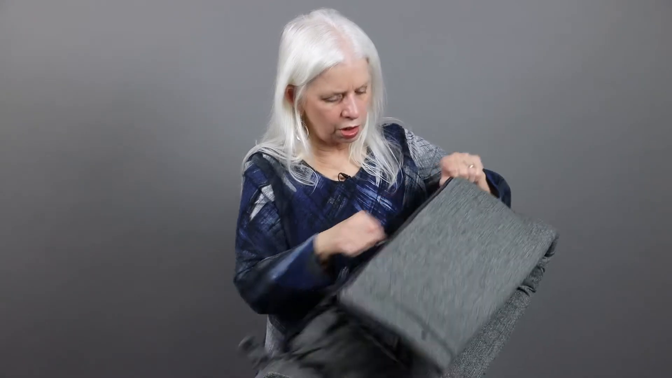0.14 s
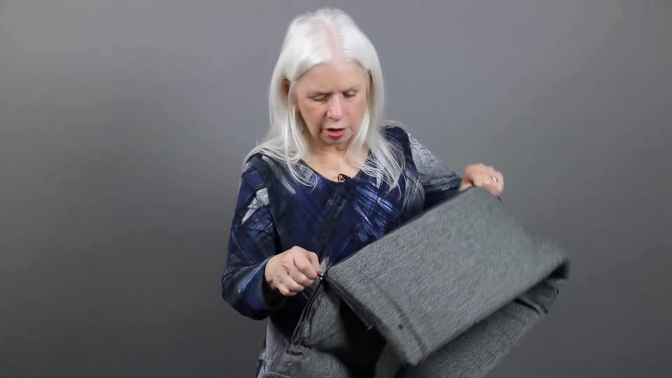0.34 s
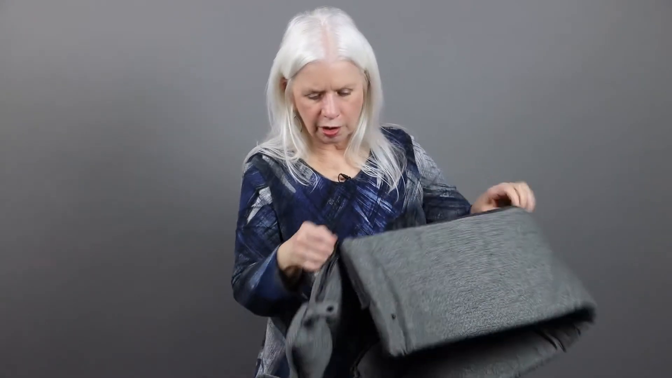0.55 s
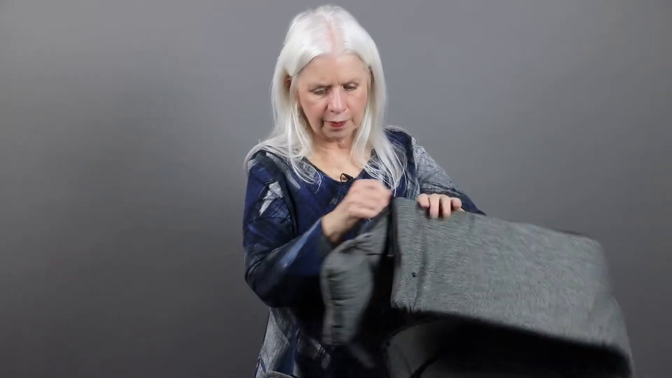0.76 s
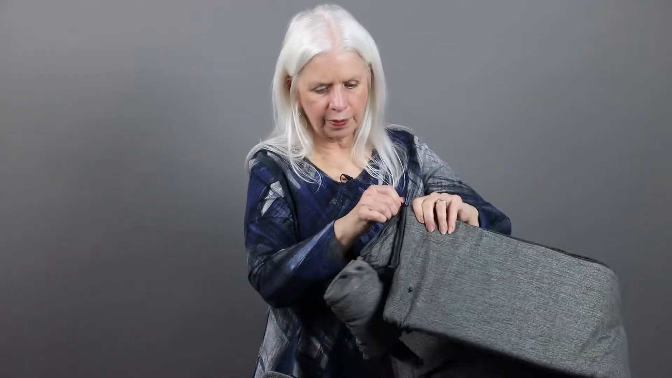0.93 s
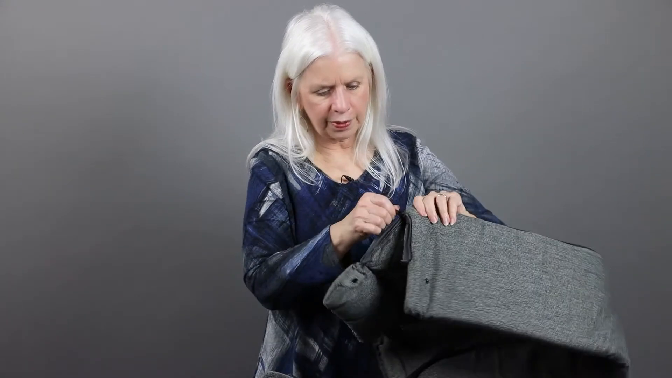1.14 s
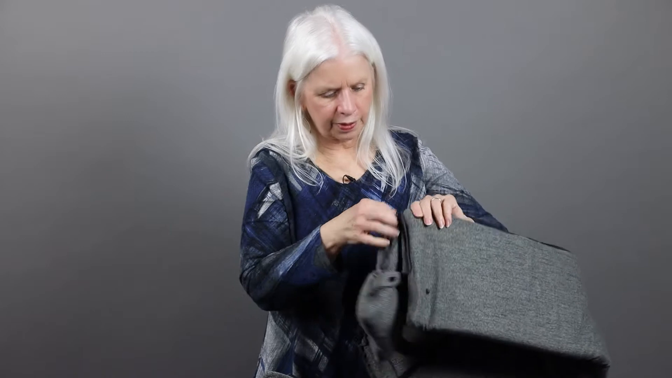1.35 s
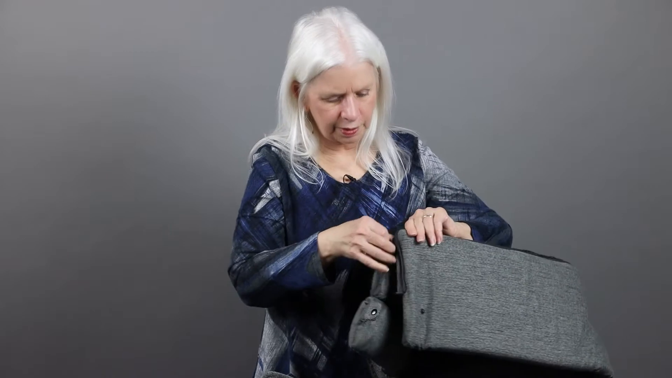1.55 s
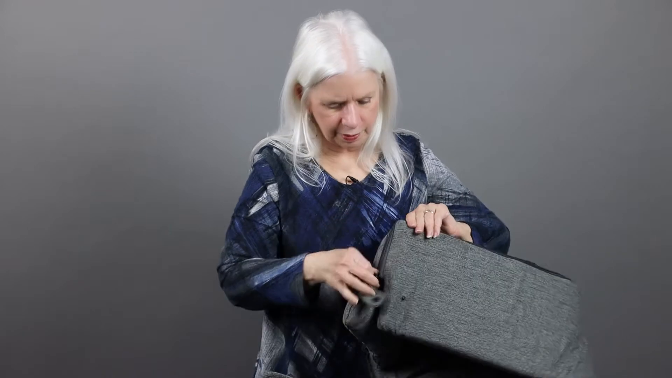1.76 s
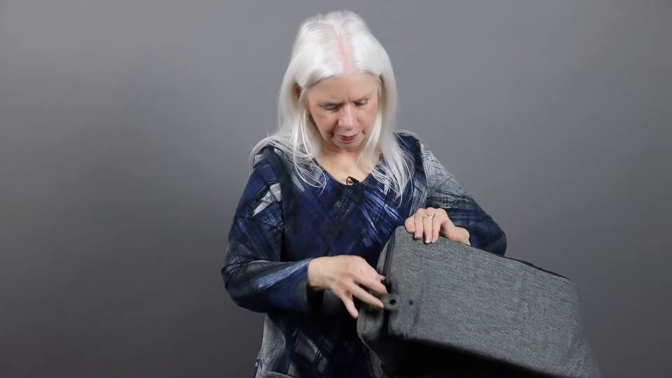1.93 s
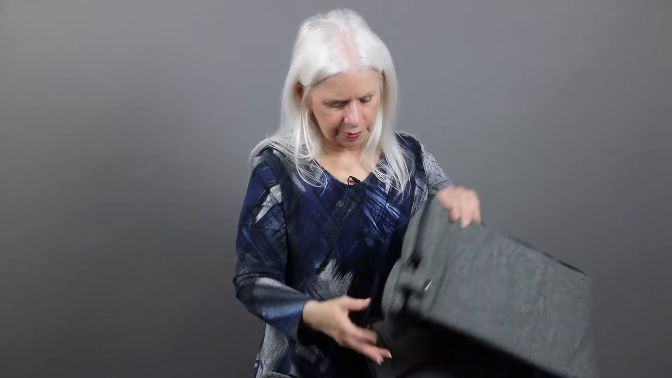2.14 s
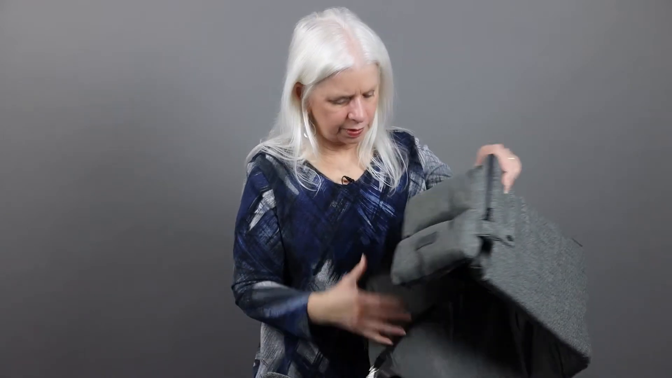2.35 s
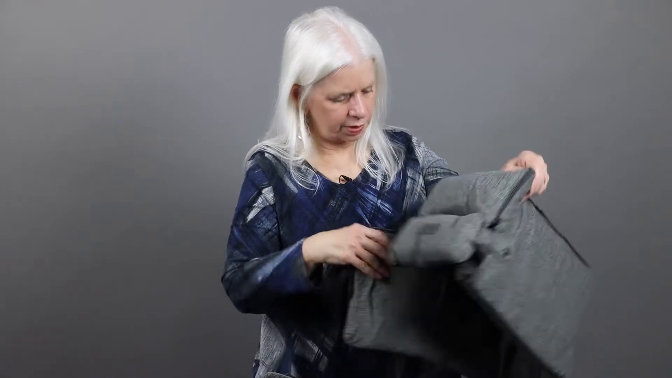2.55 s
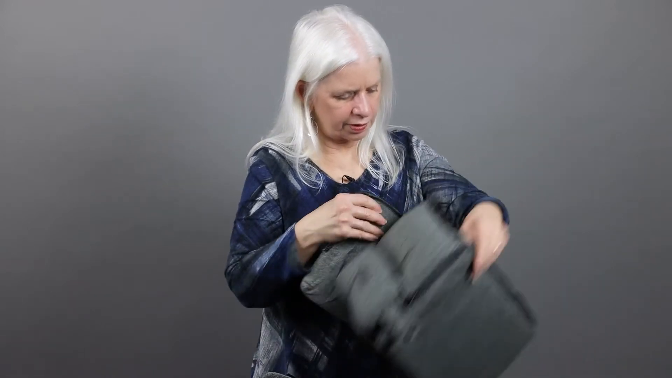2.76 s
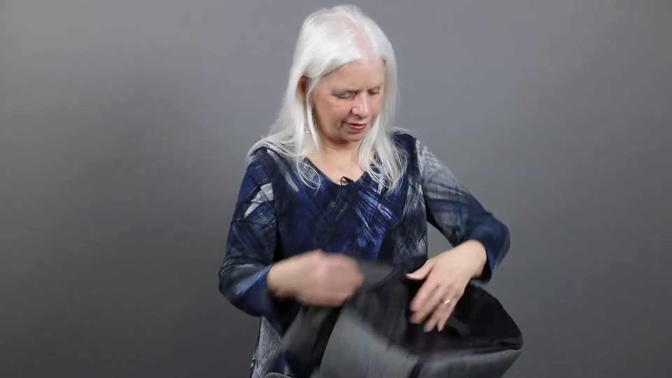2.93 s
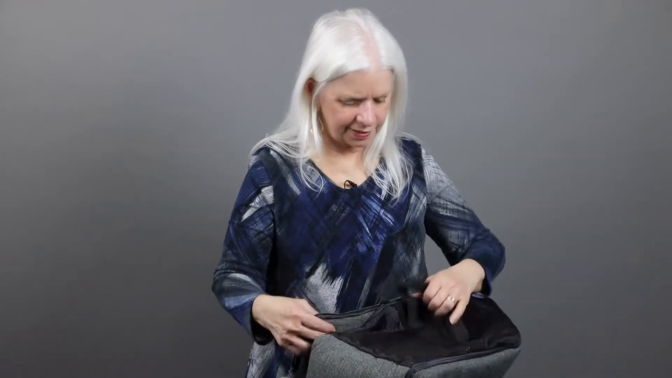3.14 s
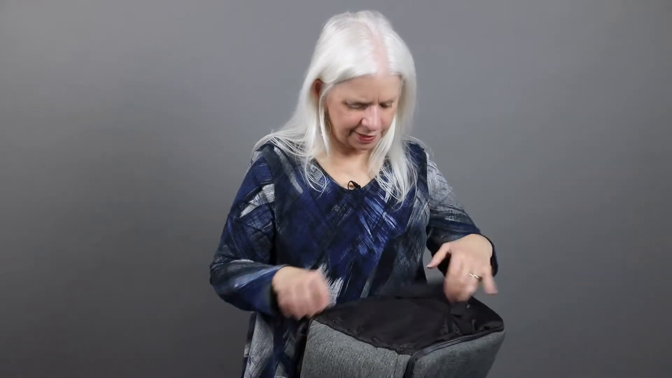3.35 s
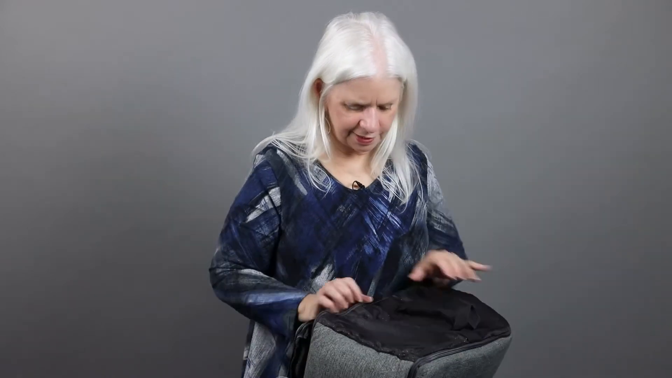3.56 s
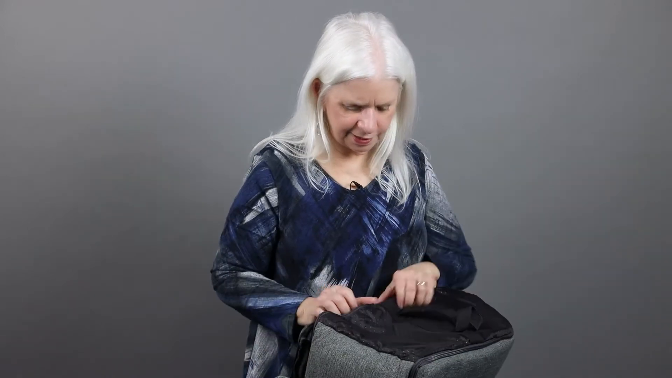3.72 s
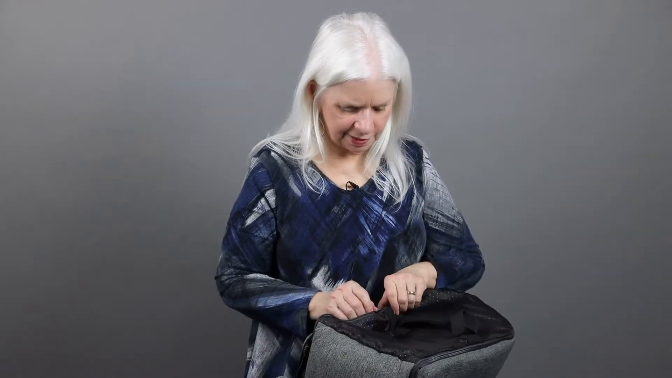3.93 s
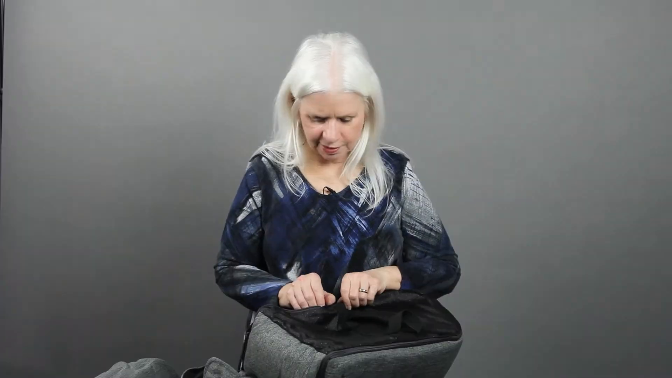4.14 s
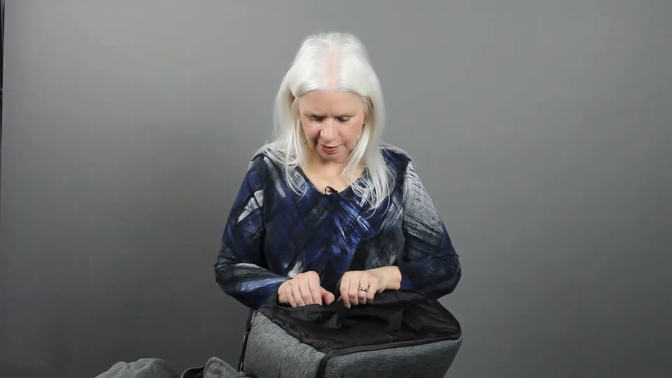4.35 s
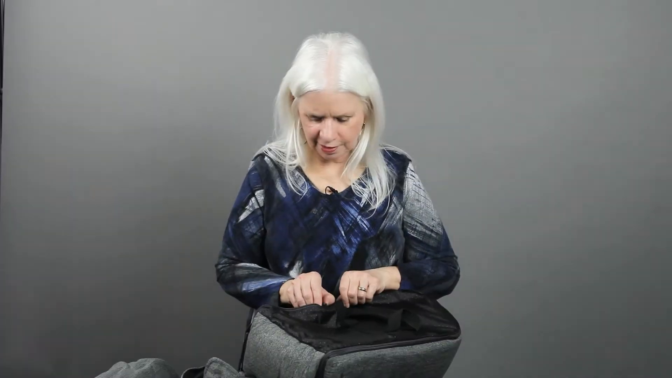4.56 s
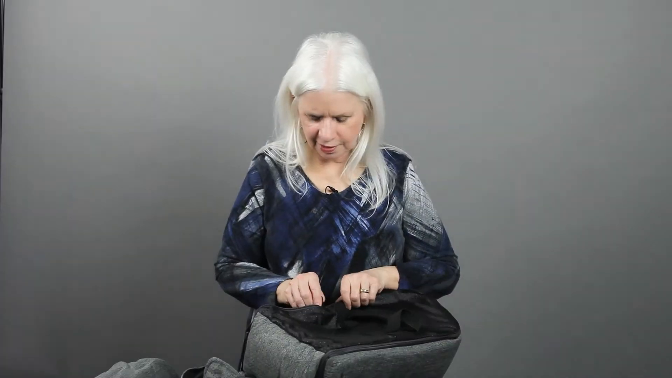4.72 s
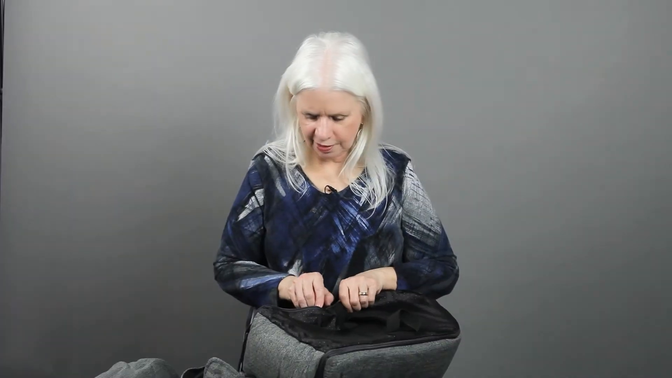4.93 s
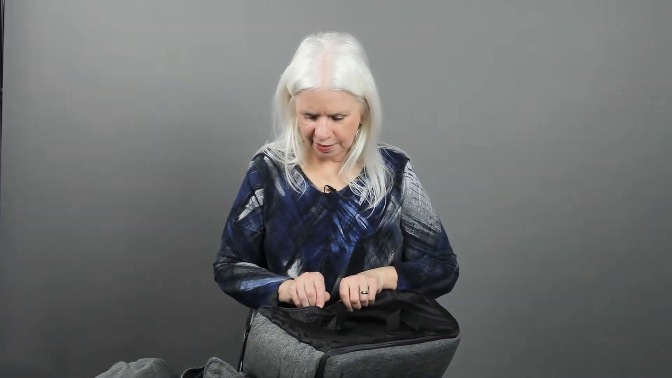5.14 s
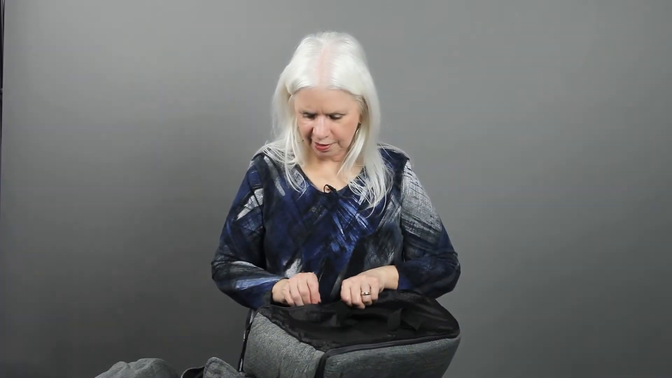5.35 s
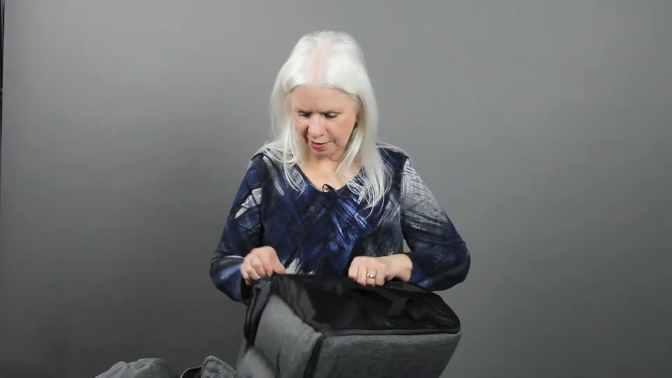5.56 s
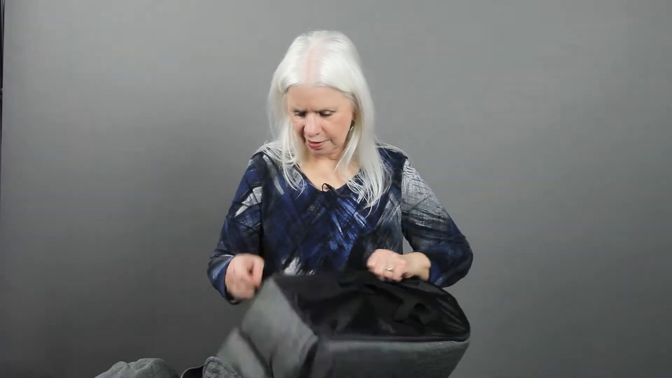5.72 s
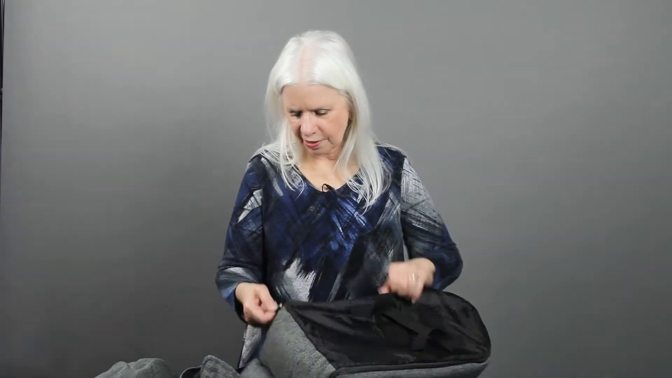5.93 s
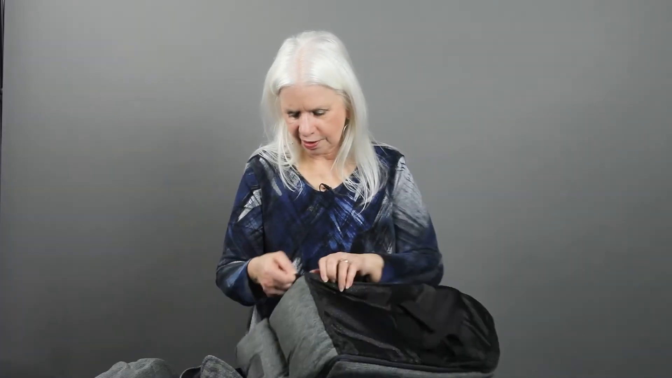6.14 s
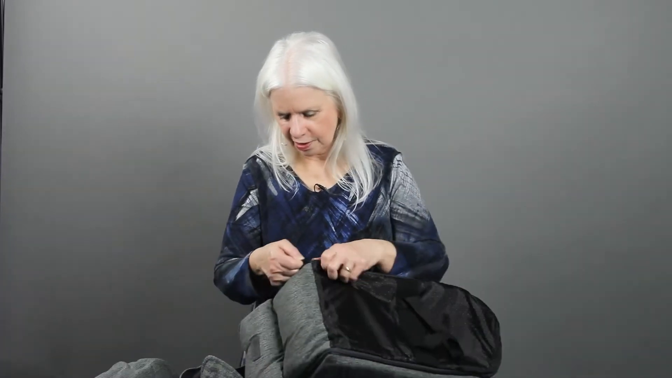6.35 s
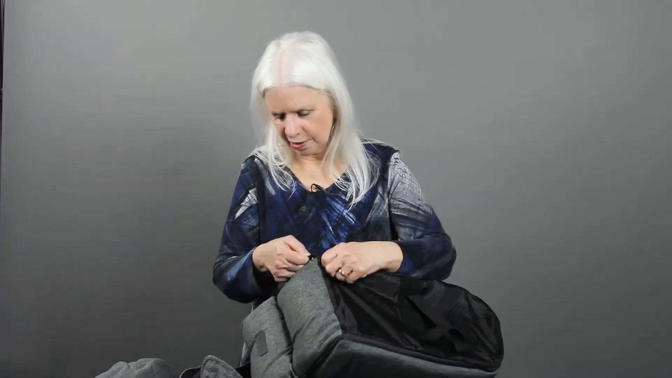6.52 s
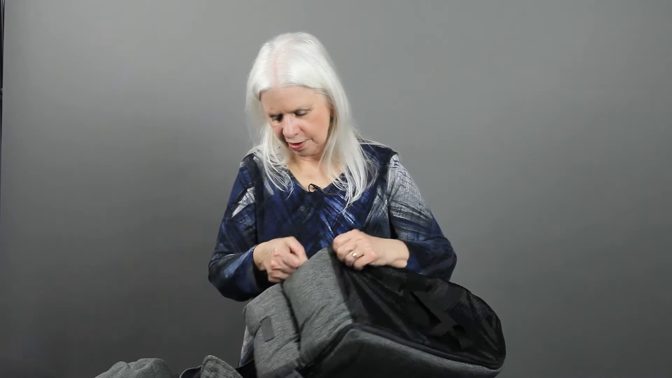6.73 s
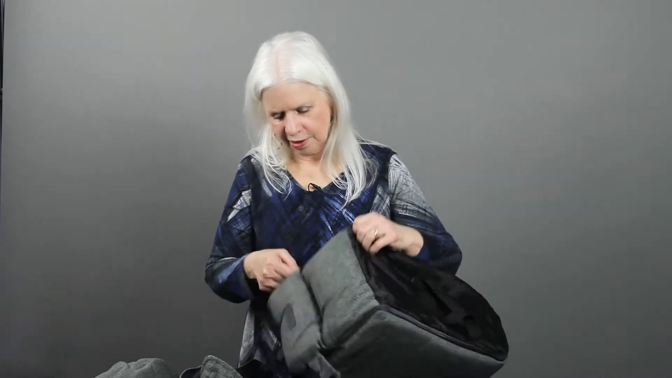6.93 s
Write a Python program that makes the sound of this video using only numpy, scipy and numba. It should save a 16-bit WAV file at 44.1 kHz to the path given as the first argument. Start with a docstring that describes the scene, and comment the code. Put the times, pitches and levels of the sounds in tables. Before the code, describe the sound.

A padded fabric bag is zipped shut close to a clip-on microphone in a quiet, dry room. The first zip is the longest and brightest, and a shorter one follows. Then the bag is shifted about, with nylon rustling, soft bumps, hand scrapes, ticks of the pull tab, tiny tugs on the slider and one brief strap squeak. Near the end come a quieter zip, a thump and a last quick zip.

```python
"""Zipping a padded bag shut

Four pulls and a few nudges, close to a clip-on microphone in a dry room. Each tooth knocks the bag's panels and
cracks in the slider. Fibres rustle, padding rumples, the bag heaves and bumps; hands stroke and scrape the
nylon, the pull tab ticks, the strap squeaks once."""
import sys
import numpy as np
from scipy import signal
from scipy.fft import rfft, irfft
from scipy.io import wavfile
from scipy.ndimage import uniform_filter1d
from numba import njit

SR = 44100
rng = np.random.default_rng(int(sys.argv[2]) if len(sys.argv) > 2 else 0)


def master(y):
    """Save y as 16-bit WAV."""
    cut = np.clip(np.atleast_2d(y).T, -1, 1)
    pcm = np.round(cut * 32767)  # scale
    wavfile.write(sys.argv[1], SR, pcm.astype(np.int16))


N = 308126

# handled cloth: (time [s], rustle [dB], rumple [dB])
CLOTH_LEVELS = [(.41, -56, -43), (.64, -63, -57), (1.05, -47, -55), (1.2, -58, -53.5), (1.45, -53, -57.5),
                (1.85, -49, -39.5), (1.95, -59.5, -55.5), (2.2, -60, -57.5), (2.7, -50.5, -51),
                (3.1, -54, -45), (3.25, -50.5, -54.5), (3.58, -44, -43.5), (3.65, -67, -66),
                (3.95, -56.5, -48), (4.16, -66.5, -61.5), (4.5, -68.5, -58), (4.95, -69, -64.5),
                (5.28, -68.5, -66), (5.36, -45.5, -45.5), (5.72, -46, -42), (5.95, -61.5, -62.5),
                (6.19, -64.5, -54.5), (6.42, -53, -53), (6.62, -55, -50.5), (6.92, -52, -49),
                (6.987, -41.5, -46.5)]
# rubbing fibres: (frequency [Hz], density [dB])
FIBRE_SPECTRUM = [(710, -47), (1200, -8.5), (1780, -2), (3010, 3), (3840, -0.5), (5160, 1), (5760, -1),
                  (8930, -0.5), (14900, -4.5), (16000, -20), (16500, -32.5)]
# padding: (centre [Hz], width [Hz], gain [dB])
PADDING_MODES = [(171.1, 151.6, -3.5), (299.4, 136, 3), (426.8, 223.3, 2), (880, 1193, -8)]


def undb(db):
    return 10 ** (np.asarray(db) / 20)


def unit(x):
    return x / np.sqrt(np.mean(x ** 2))


def levelled(x):
    """Running rms held at 1 over 30 ms."""
    return x / np.sqrt(uniform_filter1d(x ** 2, size=1300, mode="reflect") + 1e-9)


def curves(rows):
    """Columns of a timed table, one value per sample."""
    times_s, *columns = np.transpose(rows)
    return [np.interp(np.arange(N) / SR, times_s, column) for column in columns]


def add(track, x, start_s):
    i = int(start_s * SR)
    track[i:i + len(x)] += x[:N - i]


@njit
def bandpass(x, hz, width_hz):
    """State-variable filter, gain 1 at its moving centre."""
    y, band, low = np.empty(len(x)), 0., 0.
    for i in range(len(x)):
        g, damping = np.tan(np.pi * hz[i] / SR), width_hz / hz[i]
        v = (band + g * (x[i] + 1e-18 - low)) / (1 + g * (g + damping))
        band, low = 2 * v - band, low + 2 * g * v
        y[i] = damping * v
    return y


def ring(x, modes):
    """Sum of resonances of alternating sign."""
    return sum((-1) ** k * undb(db) * bandpass(x, np.full(len(x), float(hz)), float(width_hz))
               for k, (hz, width_hz, db) in enumerate(modes))


def flexing_ring(x, modes, swing_db):
    """Resonances that swell and fade separately as the bag flexes."""
    return sum((-1) ** k * undb(swing_db * wander(40)[:len(x)]) * ring(x, [mode])
               for k, mode in enumerate(modes))


def wander(rate_hz):
    """Random steps, smoothed twice."""
    hold = int(SR / rate_hz)
    steps = np.repeat(rng.standard_normal(N // hold + 1), hold)
    return uniform_filter1d(uniform_filter1d(steps, hold), hold)[:N]


def grit(n, scatter_db, share):
    """Noise in which a share of the samples are fibre slips of uneven size."""
    slips = (rng.random(n) < share) * undb(scatter_db * np.minimum(rng.exponential(size=n), 3))
    return unit(rng.standard_normal(n) * (1 + slips))


def coloured(x, spectrum):
    """x shaped by (Hz, dB) points, at rms 1."""
    hz, db = np.transpose(spectrum)
    bins_hz = np.maximum(np.fft.rfftfreq(len(x), 1 / SR), 1)
    gain = undb(np.interp(np.log(bins_hz), np.log(hz), db))
    return unit(irfft(rfft(x) * gain, len(x)))


@njit
def tooth_pulses(hz, rate_factor, strength):
    """One pulse per tooth, split between two samples; each gap has its own length."""
    pulses, phase, tooth = np.zeros(len(hz) + 1), .999, 0
    for i in range(len(hz)):
        step = hz[i] * rate_factor[tooth] / SR
        phase += step
        if phase >= 1:
            phase, tooth = phase - 1, tooth + 1
            pulses[i] += strength[tooth] * phase / step
            pulses[i + 1] += strength[tooth] * (1 - phase / step)
    return pulses[:-1]


def slider_run(hz, knock_db, crack_rel_db, zing_rel_db, panels, jitter, scatter_db):
    """Teeth knock the panels, whose upper modes zing; each also cracks and fizzes in the slider."""
    # (centre [Hz], width [Hz], gain [dB])
    slider_modes = [(2717, 554, -2.5), (4234, 6100, -6.5), (6930, 3820, -1), (9870, 4300, -3),
                    (13320, 10500, -10)]
    n, fizz_s = len(hz), .0006
    hz = hz * (1 + .012 * wander(60)[:n])  # hand speed wavers
    gap_draw, strength_draw = rng.standard_normal((n // 20 + 2, 2)).T
    pulses = tooth_pulses(hz, np.clip(1 + jitter * gap_draw, .3, 3), undb(scatter_db * strength_draw))
    fizz = signal.lfilter([1], [1, -np.exp(-1 / (fizz_s * SR))], pulses)
    friction = fizz + .22 * hz / 1000  # slider scrapes the tape more at speed
    crack = flexing_ring(pulses + .2 * friction * rng.standard_normal(n), slider_modes, swing_db=2.5)
    push = pulses + .04 * friction * rng.standard_normal(n)
    knock = levelled(ring(push, panels[:2]))
    zing = levelled(flexing_ring(push, panels[2:], swing_db=4.5))
    zing *= undb(1.5 * wander(70)[:n])  # tape flexes
    return undb(knock_db) * (knock + undb(zing_rel_db) * zing - undb(crack_rel_db) * levelled(crack))


def pulls():
    """Four long slider runs; faster teeth zing more, 1 dB per octave."""
    # per pull: (time [s], tooth rate [Hz], knock [dB], crack [dB])
    gestures = [
        [(.009, 116.6, -31, -32), (.047, 233.3, -26, -31.5), (.07, 355.1, -22.5, -27.5),
         (.09, 504.1, -23.5, -21), (.14, 792.2, -41, -25.5), (.165, 880, -24.5, -23), (.201, 961.8, -37.5, -29),
         (.241, 895, -18, -26), (.265, 745, -20.5, -30), (.357, 687.1, -23.5, -33.5),
         (.373, 338.2, -31.5, -32.5), (.41, 234.8, -33.5, -49)],
        [(1.633, 91.54, -37.5, -38), (1.669, 137.1, -39, -38.5), (1.687, 220.8, -31.5, -35.5),
         (1.723, 455.2, -32, -30.5), (1.743, 554, -24, -29), (1.757, 585.7, -30, -27.5),
         (1.767, 523.1, -24, -28.5), (1.801, 263, -26.5, -34.5), (1.85, 403, -25.5, -27)],
        [(5.334, 84.83, -40.5, -55), (5.375, 137.6, -40.5, -60.5), (5.397, 218.7, -38.5, -50.5),
         (5.443, 315.1, -38.5, -44.5), (5.473, 531.9, -40.5, -44), (5.501, 638.5, -32, -39.5),
         (5.527, 573.9, -31, -43.5), (5.575, 285.1, -34, -47), (5.605, 253, -32.5, -48.5),
         (5.679, 356.9, -33.5, -48), (5.71, 294.3, -38.5, -54.5)],
        [(6.622, 39.69, -41, -50.5), (6.642, 61.58, -36.5, -47), (6.668, 125, -29.5, -33),
         (6.7, 222.1, -27.5, -44), (6.722, 296, -28.5, -42), (6.749, 413.9, -28, -39),
         (6.803, 685.4, -31.5, -32), (6.815, 762.4, -44.5, -33.5), (6.83, 686, -26.5, -34.5)],
    ]
    # per pull, panels near the slider: (centre [Hz], width [Hz], gain [dB])
    panel_modes = [
        [(257.4, 101.5, 7.5), (768.6, 150, 10), (1561, 480, 0.5), (2360, 2600, -5)],
        [(257.4, 123.3, 2), (1142, 288, -4), (2280, 238, -1), (2890, 167, -6.5)],
        [(325, 85, 4), (745, 185, 1.5), (1338, 131, 6.5), (2500, 1140, -1)],
        [(230, 324, 6), (767, 289, 9), (1534, 396, 5.5), (2196, 346, 4.5)],
    ]
    # per pull: (zing over crack at 500 Hz [dB])
    zings_db = [-3.5, -9.5, 8.5, -1.5]
    # per pull: (tooth gap spread [ratio], tooth strength spread [dB])
    roughness = [(.022, 2.5), (.025, 2.0), (.035, 2.5), (.018, 2.0)]
    out = np.zeros(N)
    for rows, panels, zing_db, spreads in zip(gestures, panel_modes, zings_db, roughness):
        start_s, end_s = rows[0][0], rows[-1][0]
        hz, knock_db, crack_db = (c[int(start_s * SR):int(end_s * SR)] for c in curves(rows))
        crack_rel_db = crack_db - knock_db
        zing_rel_db = crack_rel_db + zing_db + np.log2(hz / 500)
        add(out, slider_run(hz, knock_db, crack_rel_db, zing_rel_db, panels, *spreads), start_s)
    return out


def cloth():
    """Fibres rustle in the treble, padding rumples below."""
    rustle_db, rumple_db = curves(CLOTH_LEVELS)
    fibres = coloured(grit(N, scatter_db=4.5, share=.006), FIBRE_SPECTRUM)
    # folds of different size sound at different moments
    folds = sum((-1) ** k * bandpass(fibres, np.full(N, hz), hz / 2) * undb(2.5 * wander(15))
                for k, hz in enumerate(1500 * 2 ** np.arange(0, 3.6, .5)))
    rustle = unit(folds) * undb(3 * wander(60))
    padding = unit(ring(grit(N, scatter_db=7, share=.0077), PADDING_MODES))
    rumple = padding * undb(5.84 * wander(35) + 1.49 * wander(9.8))
    return undb(rustle_db) * rustle + undb(rumple_db) * rumple


def heaves():
    """The bag heaves near the microphone: low puffs over a floor that follows the rumple."""
    # (time [s], peak [dB])
    puffs = [(.13, -33), (.25, -29), (.64, -47.5), (.84, -32), (1.08, -45.5), (1.4, -46), (1.65, -43.5),
             (1.85, -45.5), (2.12, -46), (2.33, -45), (2.57, -44), (2.94, -37), (3.13, -44), (3.46, -36.5),
             (3.79, -46), (4.42, -51), (5.43, -61.5), (5.76, -32.5), (5.93, -48), (6.17, -57),
             (6.48, -53.5), (6.65, -50.5), (6.831, -35), (6.99, -51.5)]
    rise_db_per_s, fall_db_per_s, floor_rel_db = 398.5, 262.5, -5.5
    t, puff_db = np.arange(N) / SR, np.full(N, -120.)
    for peak_s, peak_db in puffs:
        slopes_db = np.minimum(rise_db_per_s * (t - peak_s), fall_db_per_s * (peak_s - t))
        puff_db = np.maximum(puff_db, peak_db + slopes_db)
    _, rumple_db = curves(CLOTH_LEVELS)
    bass = unit(ring(rng.standard_normal(N), [(30, 30, 0), (110, 130, -7)])) * undb(2 * wander(15))
    return (undb(puff_db) + undb(rumple_db + floor_rel_db)) * bass


def bumps():
    """Bumped padding: a noisy ring that falls by 1/e per cycle."""
    # (time [s], peak [dB], pitch [Hz])
    blows = [(.259, -12.5, 323.8), (.405, -17.5, 584), (.654, -26.5, 565.7), (.962, -30, 480),
             (1.576, -26, 935), (1.602, -36.5, 186), (2.132, -32, 220), (2.334, -29, 545),
             (2.536, -36.5, 151), (2.696, -26, 646), (2.921, -17, 453.5), (3.034, -19, 390),
             (3.103, -19.5, 452), (3.28, -33.5, 371), (3.325, -29.5, 301), (3.491, -31.5, 207),
             (3.575, -33, 323), (3.804, -26.5, 393), (4.396, -24.5, 406), (5.756, -13.5, 323.4),
             (6.1295, -27, 416), (6.471, -28, 409.5), (6.825, -16, 546), (6.979, -27, 899)]
    out = np.zeros(N)
    for start_s, peak_db, hz in blows:
        cycles = np.arange(int(6 * SR / hz)) * hz / SR
        grain = uniform_filter1d(rng.standard_normal(len(cycles)), 1 + int(SR / hz / 6))
        thud = np.exp(-cycles) * (np.sin(2 * np.pi * cycles) + grain)
        add(out, undb(peak_db) * thud / np.abs(thud).max(), start_s)
    return out


def rub(length_s, padding_rel_db):
    """Weave and padding rubbed together."""
    n = int(length_s * SR)
    weave = coloured(grit(n, scatter_db=6.5, share=.03), FIBRE_SPECTRUM)
    padding = unit(ring(grit(n, scatter_db=7.5, share=.012), PADDING_MODES))
    return weave + undb(padding_rel_db) * padding


def strokes():
    """A slow hand on the cloth: friction swells and fades."""
    # (time [s], length [s], weave [dB], padding re weave [dB])
    passes = [(.44, 0.245, -50.5, 0), (1.138, 0.13, -50, -21.5), (1.38, 0.1363, -45, -4),
              (2.149, 0.1003, -46.5, -8), (2.321, 0.087, -55.5, 2.5), (2.492, 0.101, -48, -18),
              (2.645, 0.286, -44.5, -17), (3.284, 0.19, -48, -10), (3.539, 0.158, -52, 4.5),
              (3.785, 0.132, -53.5, 3), (3.898, 0.053, -51.5, 3.5), (4.142, 0.121, -59, 6),
              (4.41, 0.184, -59.5, 3.5), (4.492, 0.048, -63, 3), (4.692, 0.165, -59.5, 7),
              (5.843, 0.221, -52.5, 4), (6.169, 0.1133, -51.5, 6), (6.353, 0.0413, -49.5, -10.5)]
    out = np.zeros(N)
    for start_s, length_s, db, padding_rel_db in passes:
        friction = rub(length_s, padding_rel_db)
        swell = np.sin(np.pi * np.linspace(0, 1, len(friction)) ** .634)
        add(out, undb(db) * swell * friction, start_s)
    return out


def scrapes():
    """A hand or strap dragged over nylon catches at once and lets go quickly."""
    # (time [s], length [s], weave [dB], padding re weave [dB])
    drags = [(0.604, 0.0674, -39, -8), (0.826, 0.0709, -31, -4.5), (0.995, 0.0147, -42, -25.5),
             (2.127, 0.023, -44, 1), (2.514, 0.0503, -46, -11.5), (2.69, 0.0203, -39.5, 2.5),
             (3.011, 0.156, -40.5, 2), (3.494, .035, -37.5, -3.5), (5.726, 0.0345, -38.5, -0.5),
             (5.925, 0.058, -44.5, -5.5), (6.122, 0.0277, -50, 14.5), (6.439, 0.0253, -44.5, -8),
             (6.538, 0.0592, -45.5, -3.5)]
    out = np.zeros(N)
    for start_s, length_s, db, padding_rel_db in drags:
        friction = rub(length_s, padding_rel_db)
        grip = np.interp(np.linspace(0, 1, len(friction)), [0, .04, .8, 1], [.032, .915, 1, .185])
        add(out, undb(db) * grip * friction, start_s)
    return out


def ticks():
    """The pull tab ticks: a blow rings the tab modes nearest its pitch and taps the padding; fainter ticks of
    the same kind fall at random, following the rustle."""
    # (time [s], peak [dB], pitch [Hz])
    blows = [(.9836, -32, 2960), (.9926, -36.5, 5220), (1.0824, -30, 8200), (1.089, -20.5, 6440),
             (1.319, -33, 8040), (1.479, -22, 11600), (1.5384, -29, 8740), (1.5775, -22.5, 8640),
             (1.6003, -18.5, 8650), (2.1329, -22, 11600), (2.195, -30, 8460), (2.3965, -28.5, 8040),
             (2.5381, -23.5, 5440), (2.5721, -31.5, 8070), (2.601, -30.5, 7540), (2.6206, -38.5, 6880),
             (3.0155, -28.5, 2750), (3.5597, -22, 9210), (3.5764, -23, 4980), (3.9906, -26, 5070),
             (4.202, -30.5, 4270), (4.2187, -31, 2740), (4.34, -31, 4700), (4.369, -20.5, 11300),
             (4.3974, -26.5, 4700), (4.406, -33, 9000), (4.454, -34, 9180), (4.468, -44, 9000),
             (4.5905, -44.5, 4710), (4.4747, -25, 8900), (4.5018, -24, 11000), (4.614, -36, 8600),
             (4.6401, -35, 8500), (4.6504, -37, 6300), (4.8462, -23.5, 4600), (4.9608, -43.5, 2803)]
    # (centre [Hz], width [Hz], gain [dB])
    tab_modes = [(2632, 243, 6.5), (4720, 650, 0.5), (6343, 320, 1), (8824, 720, 3), (9120, 307, 3),
                 (11054, 740, 6), (14910, 1400, -9.5)]
    faint_per_s, blow_s, scatter_db, fall_db_per_oct, tap_rel_db = 3, .00022, 3, 7.5, -15.5
    out, t = np.zeros(N), np.arange(500) / SR
    when, softness, pitch = rng.random((int(faint_per_s * N / SR), 3)).T
    faint_s = when * N / SR
    cloth_s, rustle_db, _ = np.transpose(CLOTH_LEVELS)
    faint_db = np.interp(faint_s, cloth_s, rustle_db) + 19 - 8 * softness
    faint_ticks = zip(faint_s, faint_db, 2700 * 4 ** pitch)
    tap = ring(1. * (t == 0), PADDING_MODES)
    for start_s, peak_db, blow_hz in [*blows, *faint_ticks]:
        blow = rng.standard_normal(len(t)) * np.exp(-t / blow_s)
        modes = []
        for hz, width_hz, db in tab_modes:
            loss_db = fall_db_per_oct * abs(np.log2(hz / blow_hz))
            modes.append((hz, width_hz, db + scatter_db * rng.standard_normal() - loss_db))
        tab = ring(blow, modes)
        tick = tab / np.abs(tab).max() + undb(tap_rel_db) * tap / tap.max()
        add(out, undb(peak_db) * tick, start_s)
    return out


def nudges():
    """Short tugs on the slider, hardest at the start; crack and zing die before the knock."""
    # (time [s], length [s], tooth rate [Hz], knock [dB], crack re knock [dB], zing re knock [dB])
    tugs = [(1.072, 0.083, 127.1, -35.5, -9, -29), (3.455, 0.0185, 299.5, -27.5, -3.5, -19.5),
            (3.964, 0.051, 194.3, -42, -9.5, -24.5), (4.019, 0.0147, 299, -33.5, -4, -23),
            (4.482, 0.0208, 260.2, -30.5, -6.5, -30.5), (6.1492, 0.022, 269.6, -26, -11, -4),
            (3.862, 0.0353, 238.8, -41, -27, -7.5)]
    # (centre [Hz], width [Hz], gain [dB])
    panel_modes = [(365, 255, 10.5), (784, 790, -4.5), (1600, 800, 0)]
    out = np.zeros(N)
    for start_s, length_s, hz, knock_db, crack_rel_db, zing_rel_db in tugs:
        n = int(length_s * SR)
        fade_db, dull_db = np.linspace(0, -10, n), np.linspace(0, -8, n)
        run = slider_run(np.full(n, float(hz)), knock_db + fade_db, crack_rel_db + dull_db,
                         zing_rel_db + dull_db, panel_modes, jitter=.14, scatter_db=2.5)
        add(out, run, start_s)
    return out


def strap_squeak():
    """A narrow band of friction noise slides down."""
    start_s, length_s, level_db = 3.015, .075, -35
    out, n = np.zeros(N), int(length_s * SR)
    hz = np.linspace(2950, 2400, n)
    squeak = unit(bandpass(grit(n, scatter_db=-6, share=.03), hz, width_hz=140.))
    add(out, undb(level_db) * signal.windows.tukey(n, .2) * squeak, start_s)
    return out


def room(bag):
    """Adds a short, soft tail and the room's hush."""
    # (frequency [Hz], density [dB])
    hush_spectrum = [(18, -31.5), (30, 5.5), (101, -5), (533, -7.5), (1570, -37.5), (2890, -4.5),
                     (7470, -42.5), (11100, -34), (15200, -24.5), (16500, -48)]
    t60_s, delay_s, tail_db, hush_db = .25, .004, -20, -71.5
    t = np.arange(int(.3 * SR)) / SR
    tail = bandpass(rng.standard_normal(len(t)), np.full(len(t), 1500.), width_hz=6000.)
    tail *= np.exp(-np.log(1000) * t / t60_s) * (t > delay_s)
    wet = signal.fftconvolve(bag, tail / np.sqrt(np.sum(tail ** 2)))[:N]
    hush = coloured(rng.standard_normal(N), hush_spectrum)
    return bag + undb(tail_db) * wet + undb(hush_db) * hush


def scene():
    """The bag in the room, mono."""
    zipper = pulls() + nudges()
    fabric = cloth() + heaves() + scrapes() + strokes() + strap_squeak()
    return room(zipper + fabric + ticks() + bumps())[None]


def record(dry):
    """Clip-on microphone: the echo off the wearer's chest dips one band; a low-pass cuts the top."""
    notch_hz, width_hz, notch_share, top_hz = 3856., 746., .274, 15900
    notched = dry[0] - notch_share * bandpass(dry[0], np.full(N, notch_hz), width_hz)
    return signal.sosfilt(signal.ellip(8, .2, 60, top_hz, fs=SR, output="sos"), notched)[None]


dry = scene()
out = record(dry)
master(out)
```